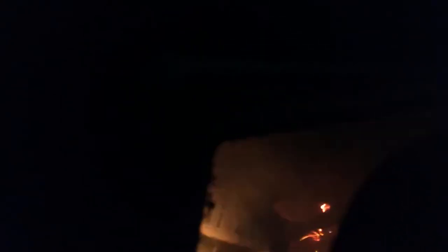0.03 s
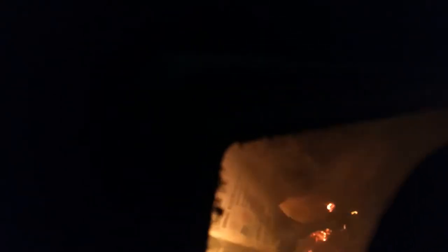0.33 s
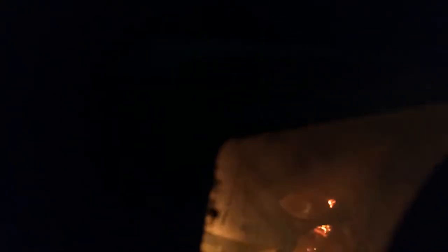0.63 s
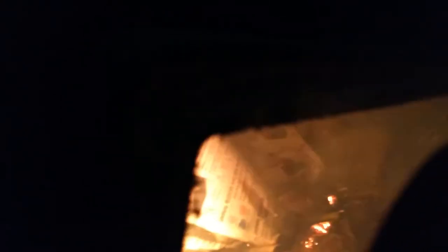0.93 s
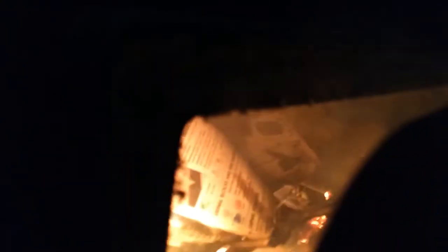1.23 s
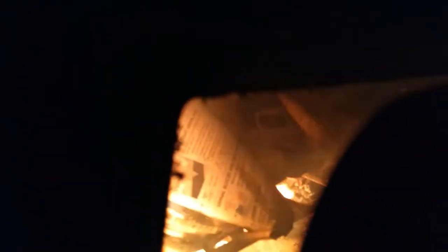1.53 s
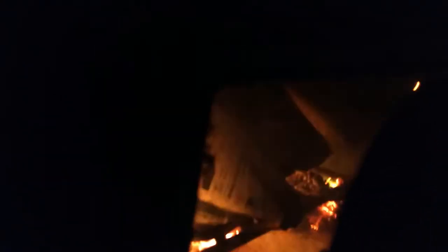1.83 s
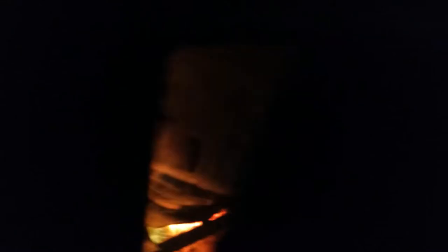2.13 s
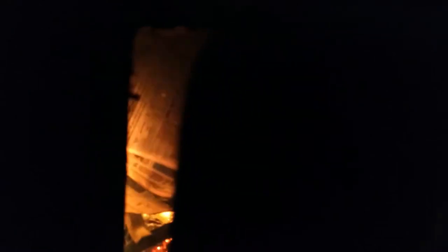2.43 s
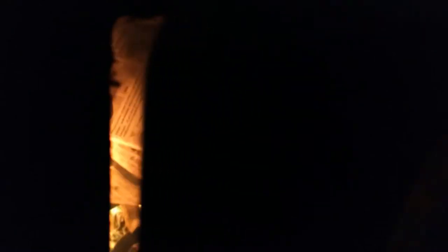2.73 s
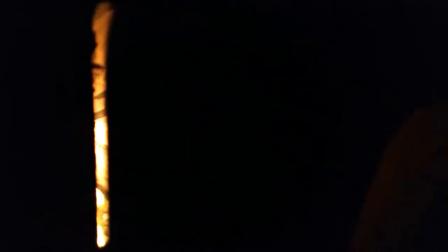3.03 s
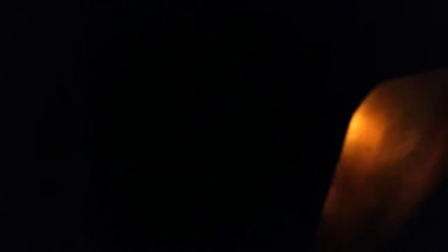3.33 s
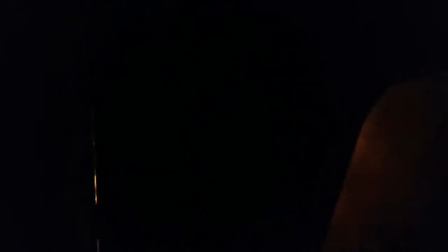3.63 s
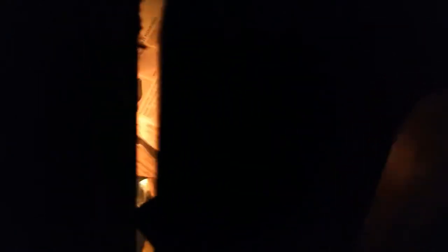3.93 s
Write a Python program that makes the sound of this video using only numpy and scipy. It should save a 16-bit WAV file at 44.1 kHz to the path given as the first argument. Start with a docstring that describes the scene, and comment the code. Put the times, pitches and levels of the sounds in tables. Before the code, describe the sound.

Air hisses into a stove fire and flames roar, then die down to faint crackles.

```python
"""A jet of air is driven into burning paper and kindling in a stove: it hisses in the embers and the
flames roar. The microphone is close to the opening, and its right port rings in the high treble.
Puffs of flame boom in the firebox as the air weakens, then stops after about two seconds.
The roar dies away, the flames sink to a soft flutter, and a few crackles spit over a faint sizzle."""
import sys
import numpy as np
from scipy import signal
from scipy.fft import rfft, irfft, next_fast_len
from scipy.io import wavfile
from scipy.ndimage import uniform_filter1d, map_coordinates

SR = 44100
rng = np.random.default_rng(int(sys.argv[2]) if len(sys.argv) > 2 else 0)


def transcribe(signal):
    """Save signal, clipped to [-1, 1], as a 16-bit WAV file at the path in sys.argv[1]."""
    frames = np.atleast_2d(signal).T
    limited = np.clip(frames, -1, 1)
    pcm = np.round(limited * 32767).astype(np.int16)
    wavfile.write(sys.argv[1], SR, pcm)


N = 176400


def amp(db):
    return 10 ** (np.asarray(db) / 20)


def unit(x):
    return x / np.sqrt(np.mean(x ** 2) + 1e-20)


def along(points, hz):
    """Read (frequency [Hz], value) points on a log frequency axis."""
    freqs, values = np.transpose(points)
    return np.interp(np.log(hz + 1), np.log(freqs + 1), values)


def curve(rows):
    """One value per sample from (time [s], value) rows."""
    return np.interp(np.arange(N) / SR, *np.transpose(rows))


def wobble(rate):
    """A smooth random curve, rate knots a second."""
    return map_coordinates(rng.standard_normal(4000), [np.arange(N) * rate / SR], mode="wrap")


def filtered(x, response):
    """Shape x with a complex frequency response."""
    size = next_fast_len(N + SR // 2)
    return irfft(rfft(x, size) * response(np.fft.rfftfreq(size, 1 / SR)), size)[..., :N]


def patchy(x, depth_db):
    """Narrow bands swell and fade at random."""
    bands = signal.stft(x, nperseg=512)[2]
    swell = uniform_filter1d(rng.standard_normal(bands.shape[1:]), size=4, axis=0)  # across frequency
    swell = uniform_filter1d(swell, size=50, axis=1)  # across time
    return signal.istft(bands * amp(depth_db * unit(swell)), nperseg=512)[1][:, :N]


def pops(rate, spread_db):
    """Impulses at random times, rate a second, of scattered size."""
    return (rng.random(N) < rate / SR) * amp(spread_db * np.clip(rng.standard_normal(N), -2, 2))


def burst(start, t60, attack):
    """An envelope with a quick rise and an exponential fall; all times in seconds."""
    age = np.maximum(np.arange(N) / SR - start, 0)
    return (1 - np.exp(-age / attack)) * amp(-60 * age / t60)


def rush(spectrum):
    """Stereo noise from the stove's opening as the two ports receive it, rms 1 in the middle."""
    # stereo image ahead of the port colours (frequency [Hz], left-right correlation [-1..1])
    likeness = [(100, 1), (400, 0.9), (1000, 0.62), (2000, -0.55), (4000, -0.15), (15000, 0.1)]
    # colour of the path to the left port (frequency [Hz], gain [dB])
    left_eq = [(600, 1.5), (1000, -6), (1250, -5), (1600, 0.5), (2150, 1), (2520, -18.5), (2950, 0.5),
               (7300, 4.5), (8400, 0.5), (9500, 6), (11200, -5), (15500, -2)]
    # colour of the path to the right port (frequency [Hz], gain [dB])
    right_eq = [(500, 1.5), (610, 9), (720, -3), (850, -12), (990, 3), (1170, -5), (1650, -3.5),
                (2500, 1.5), (7000, 5.5), (8800, 8.5), (10150, 13.5), (15500, 4.5)]

    def mid_side(hz):
        angle = np.arccos(np.clip(along(likeness, hz), -1, 1)) / 2
        return amp(along(spectrum, hz)) * [np.cos(angle), np.sin(angle)]

    mid, side = filtered(rng.standard_normal((2, N)), mid_side)
    pair = np.array([mid + side, mid - side])
    pair = filtered(pair, lambda hz: amp([along(left_eq, hz), along(right_eq, hz)]))
    return pair / pair.mean(0).std()


def room_tone(level_db=-83):
    """Faint even hiss of the room and the microphone."""
    # colour of the noise bed (frequency [Hz], level [dB])
    colour = [(30, 16.7), (200, 5), (700, 9.3), (2000, 5.1), (7000, 0.23), (15500, 1.4)]
    bed = filtered(rng.standard_normal((2, N)), lambda hz: amp(along(colour, hz)))
    return amp(level_db) * unit(bed)


def crackles(snap_s=1.7772, snap_db=-52):
    """Sharp spits, one snapping twig and a faint sizzle of tiny ticks,
    with thin high bands that swell and fade at random."""
    # single spits of the fire (time [s], level [dB], 60 dB decay [s])
    spit_cues = [(1.289, -53, .02), (1.418, -50.5, 0.038), (1.7291, -51, 0.022), (2.365, -66, .02),
                 (2.393, -66, 0.03), (3.231, -71.5, .033), (3.777, -56, .022), (3.848, -63.5, .015),
                 (3.866, -64.5, 0.023), (3.958, -66.5, 0.021)]
    # bright colour of a spit (frequency [Hz], level [dB])
    spit_colour = [(2500, -31), (7000, -6.5), (9800, 9), (15500, -6)]
    # envelope of the sizzle (time [s], level [dB])
    sizzle_level = [(1.8, -68), (2.1, -76.5), (2.5, -74.5), (2.9, -83.5), (3.3, -82), (3.7, -88.5),
                    (3.82, -77), (4, -83.5)]
    # colour of the sizzle (frequency [Hz], level [dB])
    sizzle_colour = [(1000, -13), (6500, -13.5), (8300, -5.5), (10200, -5.5), (12000, -7.5), (15500, -13)]
    # colour of the breaking twig (frequency [Hz], level [dB])
    snap_colour = [(3600, -15), (4100, 3), (5200, -5), (6000, -17), (7200, -7), (8200, -26)]
    spits = sum(amp(db) * burst(start, t60, attack=0.00022) for start, db, t60 in spit_cues)
    ticks = signal.fftconvolve(pops(rate=970, spread_db=7.0), burst(0, t60=0.064, attack=0.00015))[:N]
    sizzle = unit(ticks) * amp(curve(sizzle_level)) * unit(patchy(rush(sizzle_colour), depth_db=4.5))
    snap = amp(snap_db) * burst(snap_s, t60=0.029, attack=0.00038)
    return spits * rush(spit_colour) + sizzle + snap * rush(snap_colour)


def firebox(pressure):
    """Pressure pulses ring the hollow of the stove."""
    # cavity resonances (frequency [Hz], bandwidth [Hz], gain [dB])
    modes = [(87.5, 9.6, -1.5), (114, 24, 1), (138.25, 9.1, 5.5), (350, 72, -14.5), (412, 36, -15),
             (736, 180, -27)]
    return filtered(pressure, lambda hz: sum(
        amp(db) * 1j * hz * width / (centre ** 2 - hz ** 2 + 1j * hz * width)
        for centre, width, db in modes))


def flame_rumble(flicker_db=2.0, push_width_s=0.00088, left_db=-2.5, left_lag_s=0.00016):
    """Many soft flicks of flame and larger puffs boom in the firebox, later at the left port."""
    # envelope of the fluttering flames (time [s], level [dB])
    flame_level = [(0, -44), (.76, -47.5), (1.22, -40.5), (1.31, -44.5), (1.43, -44), (1.6, -43.5),
                   (2.03, -45.5), (2.11, -52), (2.5, -59), (2.62, -64.5), (3.04, -57), (3.15, -66.5),
                   (3.33, -64.5), (3.41, -66.5), (3.56, -64), (3.66, -72.5), (3.8, -63), (4, -62.5)]
    # puffs of flame; a shorter push sounds brighter (time [s], level [dB], push width [s])
    puff_cues = [(0.849, -31, 0.0012), (1.084, -29, 0.0014), (1.195, -30, 0.00094), (1.243, -39.5, 0.00052),
                 (1.805, -25.5, 0.0027), (1.976, -36, 0.00084), (2.07, -42, 0.00099), (2.426, -44, 0.00095),
                 (2.508, -44, 0.00096), (2.72, -46.5, 0.0012), (2.874, -59, 0.00049), (2.95, -59, .0006),
                 (3.026, -42.5, 0.0011), (3.477, -50, 0.0012), (3.547, -59, 0.00055),
                 (3.858, -60.5, 0.00045), (3.906, -51, 0.00065)]

    def push(at, width):
        return np.exp(-((np.arange(N) / SR - at) / width) ** 2) / width

    flicks = pops(rate=400, spread_db=3.0) * np.sign(rng.standard_normal(N))
    flicks *= amp(flicker_db * wobble(22.23))
    flicks = filtered(flicks, lambda hz: np.exp(-(np.pi * hz * push_width_s) ** 2))  # soften each click
    flutter = flicks / firebox(flicks).std() * amp(curve(flame_level))
    boom_peak = np.abs(firebox(push(1, push_width_s))).max()
    puffs = sum(amp(db) * push(at, width) for at, db, width in puff_cues) / boom_peak
    right = firebox(flutter - puffs)
    left = amp(left_db) * filtered(right, lambda hz: np.exp(-2j * np.pi * hz * left_lag_s))
    return np.array([left, right])


def flame_roar(flutter_db=1.5):
    """Fanned flames tear and flutter, then die away."""
    # surges of the turbulence (time [s], level [dB])
    level = [(0, -49), (.3, -53), (.42, -51.5), (.56, -61.5), (.66, -53), (.79, -60), (.85, -53),
             (1.0, -57), (1.15, -64.5), (1.23, -60.5), (1.4, -65), (1.72, -69.5), (1.79, -62.5),
             (1.86, -70.5), (2.2, -77), (2.48, -76.5), (2.7, -100)]
    # low, full body of the roar (frequency [Hz], level [dB])
    colour = [(80, -26.5), (160, 9), (235, 3), (300, 3), (440, 3.5), (580, -9.5), (700, 3.5), (1000, 0),
              (1500, -4.5), (2200, -13.5), (4000, -23.5), (9000, -60)]
    return rush(colour) * amp(curve(level) + flutter_db * wobble(70))


def air_jet(flutter_db=1.3, shrill_half_width_hz=770, waver_hz=109.7):
    """Broad wavering hiss of the air in the embers, with a shrill band at the right port."""
    # envelope of the jet (time [s], level [dB])
    level = [(0, -58), (.08, -55.5), (.42, -56), (.55, -59), (.9, -60), (1.2, -63), (1.56, -63.5),
             (1.64, -69.5), (1.72, -80), (1.95, -77.5), (2.1, -100)]
    # colour of the broad hiss (frequency [Hz], level [dB])
    colour = [(300, -49), (1500, -9.5), (2600, 5.5), (3300, -5), (3590, 9.5), (3800, 2.5), (5000, 4),
              (6000, 1), (8000, 4.5), (15500, -1)]
    # centre of the shrill band, drifting with the jet (time [s], frequency [Hz])
    shrill_pitch = [(0, 9900), (.4, 9500), (.65, 10200), (.87, 10500), (1.4, 10040)]
    # shrill band relative to the broad hiss (time [s], level [dB])
    shrill_level = [(0, -3.5), (.8, 5.5), (1.6, 4.5)]
    band = unit(filtered(rng.standard_normal(N), lambda hz: 1 / (1 + (hz / shrill_half_width_hz) ** 2)))
    pitch = curve(shrill_pitch) + waver_hz * wobble(12)
    carrier = np.sqrt(2) * np.sin(2 * np.pi * np.cumsum(pitch) / SR)
    shrill = band * carrier * amp(curve(shrill_level))  # lifts the noise band up to that pitch
    left, right = patchy(rush(colour), depth_db=1.34)
    return np.array([left, right + shrill]) * amp(curve(level) + flutter_db * wobble(12.52))


def scene():
    """Air, flames and crackles over the room tone."""
    return air_jet() + flame_roar() + flame_rumble() + crackles() + room_tone()


def record(dry, low_cut_hz=55, top_hz=15780):
    """A low cut thins the deep bass, and a brick-wall filter takes off the highest treble."""
    thinned = signal.sosfilt(signal.butter(2, low_cut_hz, "high", fs=SR, output="sos"), dry)
    return filtered(thinned, lambda hz: hz < top_hz)


dry = scene()
out = record(dry)
transcribe(out)
```